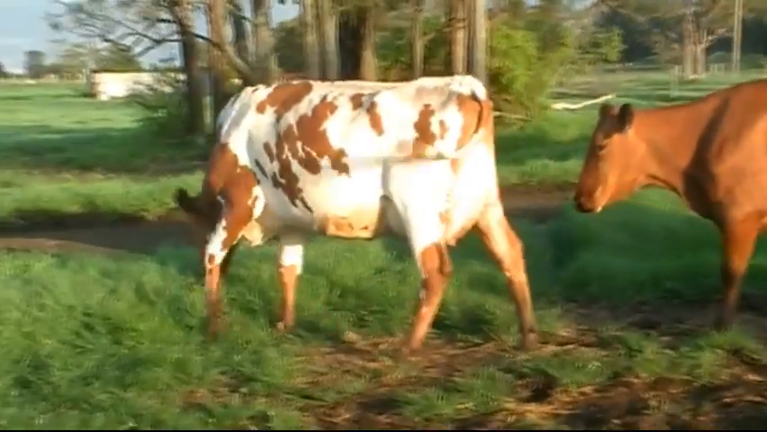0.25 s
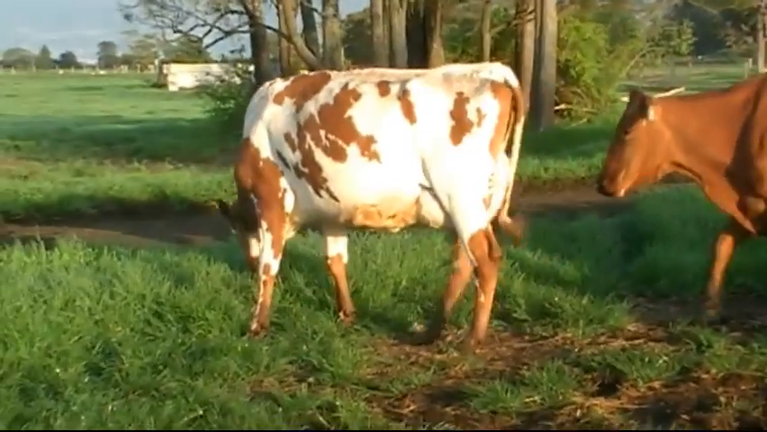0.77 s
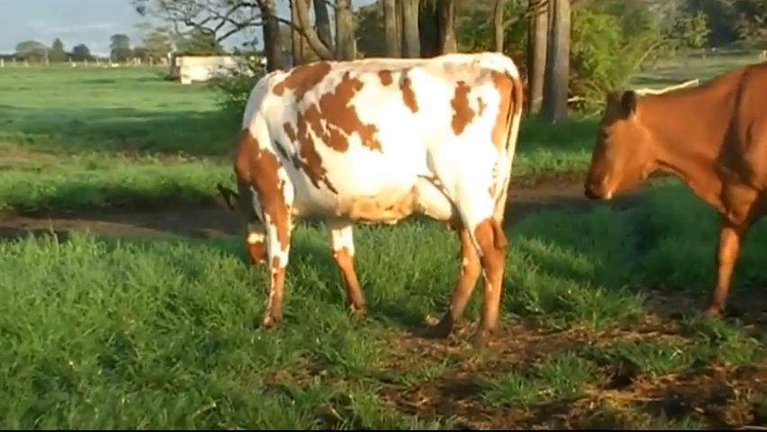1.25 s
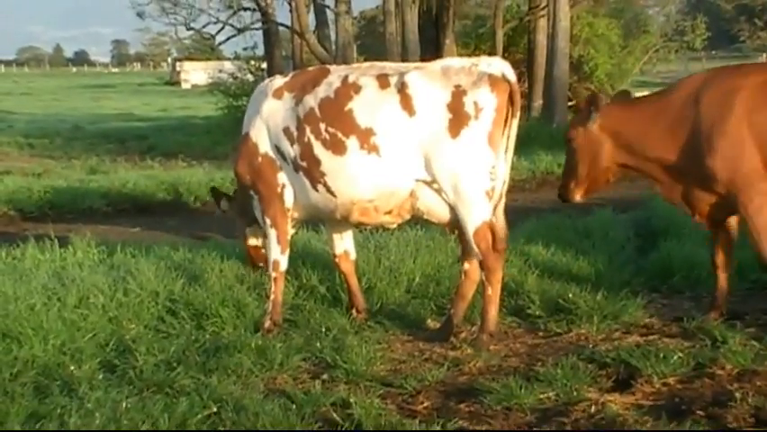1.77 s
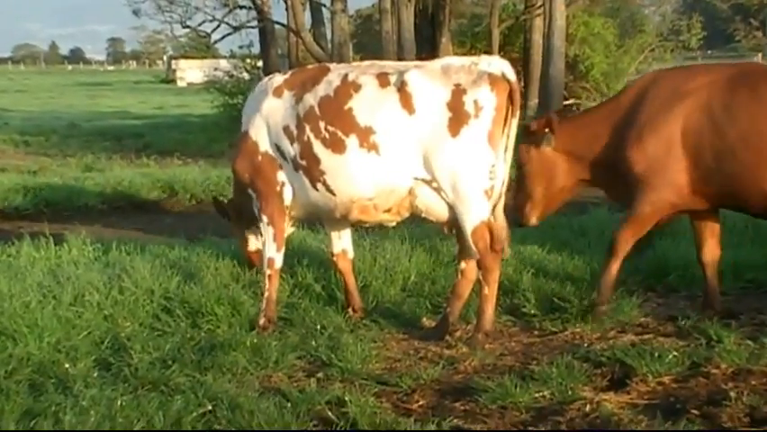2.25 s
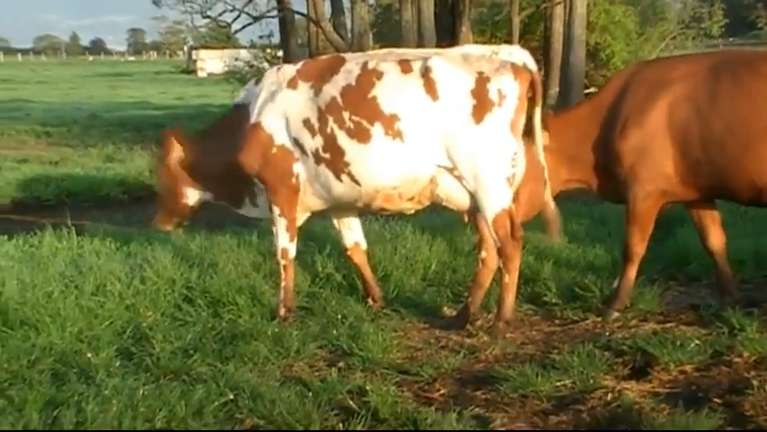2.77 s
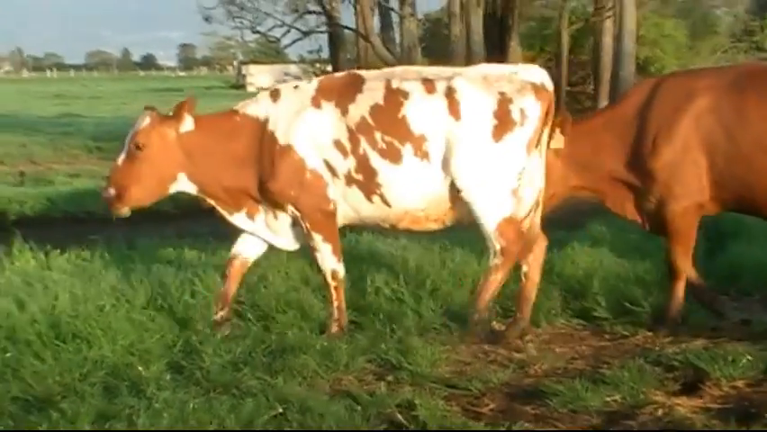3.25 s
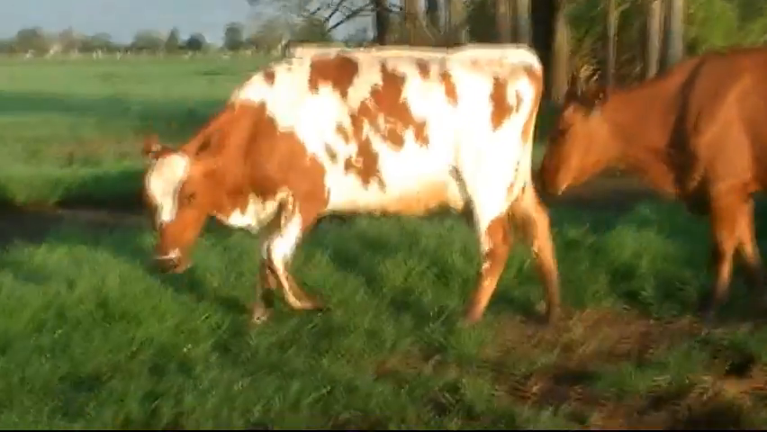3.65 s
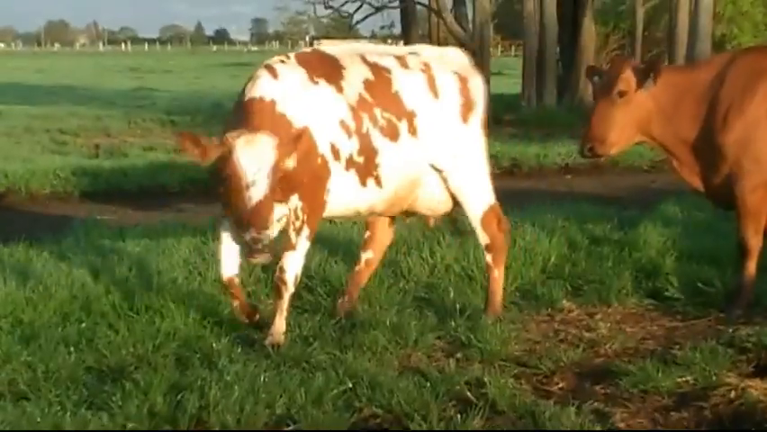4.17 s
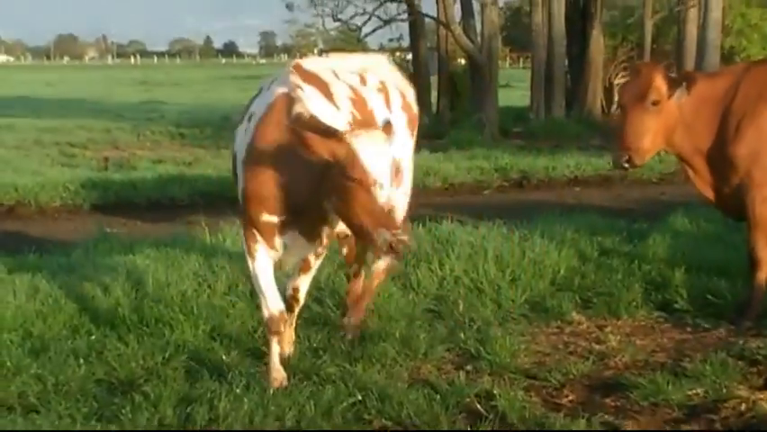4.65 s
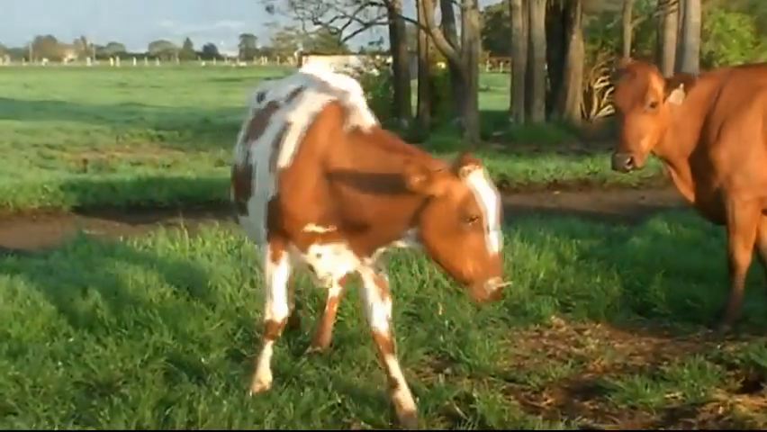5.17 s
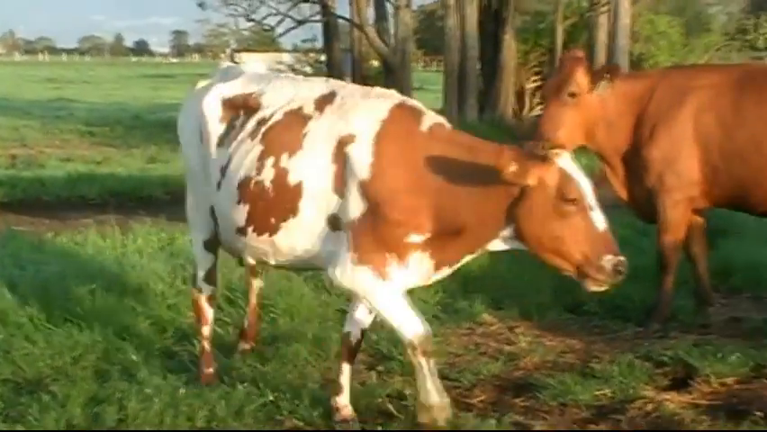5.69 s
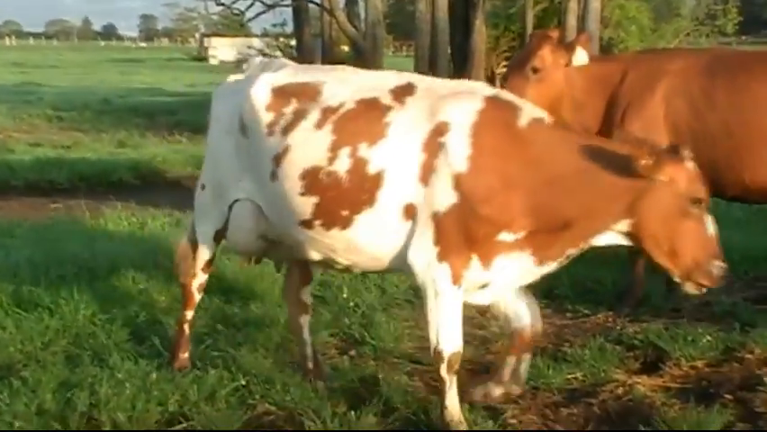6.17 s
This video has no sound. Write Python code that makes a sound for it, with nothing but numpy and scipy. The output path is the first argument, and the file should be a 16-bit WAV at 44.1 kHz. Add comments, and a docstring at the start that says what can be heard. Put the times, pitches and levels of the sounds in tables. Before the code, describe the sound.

Outdoors in a quiet pasture, the tails of two cow moos sink away at once. Grass swishes and a stalk snaps, a distant moo rises, then a growl climbs into a soft held note and drops to a hum. A loud, cracking bellow follows, overlapped by a hoarse second cow. Afterwards only faint birds, rustling grass and far moos remain. Stereo microphones, with the herd off to one side.

```python
"""Cows moo over one another in an open paddock: low growls climb, break hoarsely into held notes, and
some notes sink as the air runs out. Distant moos, grass swishes, snapping stalks, bird trills and whistles.
Moos are vocal-fold pulses and air puffs through throat resonances; grass and field are shaped noise;
birds are gliding sines; trees add a faint echo of the herd."""
import sys
import numpy as np
from scipy import signal
from scipy.fft import rfft, irfft, next_fast_len
from scipy.io import wavfile
from scipy.ndimage import uniform_filter1d

SR = 44100
rng = np.random.default_rng(int(sys.argv[2]) if len(sys.argv) > 2 else 0)


def materialize(psi):
    """Save the field psi as 16-bit PCM at rate SR to the path in sys.argv[1].

    A 1-D psi becomes a single channel; in a 2-D psi each row is a channel.
    """
    bounded = np.clip(np.atleast_2d(psi).T, -1, 1)
    quanta = np.round(bounded * 32767).astype(np.int16)
    wavfile.write(sys.argv[1], SR, quanta)


N = 283122
TIME = np.arange(N) / SR
CUTOFF_HZ = 15800


def from_db(db):
    """Decibels to amplitude gain."""
    return 10 ** (np.asarray(db) / 20)


def rms_one(x):
    """Scale to rms 1."""
    return x / np.sqrt(np.mean(x ** 2) + 1e-20)


def band(x, edges_hz, kind, order=4):
    """Butterworth filter."""
    return signal.sosfilt(signal.butter(order, edges_hz, kind, fs=SR, output="sos"), x)


def colour(x, points):
    """Apply a (f/Hz, gain/dB) spectrum, interpolated over log frequency."""
    size = next_fast_len(N + 4096)
    hz, db = np.transpose(points)
    bin_hz = np.arange(size // 2 + 1) * SR / size
    gain = from_db(np.interp(np.log(bin_hz + 1), np.log(hz), db))
    return irfft(rfft(x, size) * gain, size)[..., :N]


def drift(knots_per_s, size):
    """Random curve of straight segments, rms 1."""
    knots = np.arange(size) * knots_per_s / SR
    return rms_one(np.interp(knots, np.arange(8192), rng.standard_normal(8192)))


def even(x, size=1500):
    """Flatten slow level changes; size in samples."""
    return x / np.sqrt(np.abs(uniform_filter1d(x * x, size)) + 1e-12)


def fade(start, end, fade_s=.02):
    """1 from start to end, ramping to 0 just outside."""
    return np.clip(1 + np.minimum(TIME - start, end - TIME) / fade_s, 0, 1)


def progress(start, end):
    """Runs from 0 at start to 1 at end."""
    return np.clip((TIME - start) / (end - start), 0, 1)


def from_right(x):
    """Sound from the right: the left channel lags by a phase that depends on frequency."""
    # f/Hz, phase lag/rad
    lag = [(0, 1.6), (260, 1), (1000, 1.62), (2100, 1.6), (4300, 2.65), (7200, 3.9), (12500, 6.4)]
    size = next_fast_len(N + 4096)
    bin_hz = np.arange(size // 2 + 1) * SR / size
    phase = np.interp(bin_hz, *np.transpose(lag))
    left = irfft(rfft(x, size) * np.exp(-1j * phase), size)[:N]
    return np.array([left, x])


def field(level_db=-48.5, side_db=-7, left_db=2.5):
    """A soft wash of distant country noise: common and opposed noise make the two sides partly differ."""
    # open-air spectrum: f/Hz, level/dB
    spectrum = [(15, -47), (25, -13), (97, 0), (126, -5), (366, -16.5), (488, -11.5), (533, -9),
                (1130, -15), (1610, -19), (2900, -31), (3650, -22.5), (5000, -30.5), (6500, -20.5),
                (11000, -120)]
    mid, side = band(colour(rng.standard_normal((2, N)), spectrum), 4530, "low")
    left_right = np.array([[1], [-1]])
    wash = rms_one(mid) + from_db(side_db) * rms_one(side) * left_right
    return from_db(level_db + left_db * left_right) * wash


def resonate(x, modes, wander=0):
    """Parallel resonances of alternating sign, each wandering around its own frequency."""
    wander_knots_per_s = 14
    out = 0
    for k, (hz, width_hz, db) in enumerate(modes):
        r = np.exp(-np.pi * width_hz / SR)
        path = np.cumsum(1 + wander * drift(wander_knots_per_s, x.shape[-1]))
        turn = np.exp(2j * np.pi * hz / SR * path)
        # shift the resonance to 0 Hz, smooth, shift back
        ringing = turn * signal.lfilter([1, 1], [1, -r], x * turn.conj())
        out = out + (-1) ** k * from_db(db) * (1 - r) * ringing.real
    return out


def moo(gesture, throat, jitter=0.038, chest_air=0.34, mouth_air=6.8, rasp_air=4, top_hz=3800,
        hiss_db=-35, doubling=0.61):
    """Vocal-fold pulses and puffs of turbulence ring the throat; roughness unsettles both."""
    # muzzle air spectrum: f/Hz, level/dB
    breath = [(2800, -12), (4100, 1.5), (4650, 12.5), (5300, 11), (6000, 1), (11000, -2.5), (13000, -4),
              (15500, -36.5)]
    throat_wander = .014  # tongue and jaw shift each resonance by this share of its frequency
    flutter_db, flutter_knots_per_s = 1.5, 28
    gate, *controls = gesture
    on = gate > 0
    t, out = TIME[on], np.zeros(N)
    pitch, chest_db, mouth_db, rasp_db, rough = [np.broadcast_to(c, N)[on] for c in controls]
    # slight waver, plus fast irregularity in strained folds
    pitch = pitch * (1 + .003 * drift(25, len(t)) + jitter * rough * drift(260, len(t)))
    cycles = np.cumsum(pitch) / SR
    flow = .5 - cycles % 1
    pulses = rms_one(band(np.diff(flow, prepend=.5), CUTOFF_HZ, "low", order=2))
    # strained folds close strongly and weakly in turn: lines between the overtones
    pulses = pulses * (1 + doubling * rough * np.cos(np.pi * cycles))
    # one air puff per fold opening
    puffs = rms_one(rng.standard_normal(len(t)) * (.5 + 2 * np.exp(-4 * (cycles % 1))))
    tone, air = resonate(np.array([pulses, puffs * rough]), throat, throat_wander)
    # chest: the air flow itself; mouth and rasp: the throat's overtones
    rumble = chest_air * rough * rms_one(band(puffs, [190, 330], "band"))
    chest = band(rms_one(flow) + rumble, 336, "low", order=6)
    chest = even(band(chest, 140, "high", order=2))
    mouth = even(band(tone + mouth_air * air, [470, 1050], "band"))
    rasp = band(tone + rasp_air * air, 1195, "high", order=6)
    rasp = even(band(rasp, top_hz, "low"))
    rasp_db = rasp_db + flutter_db * drift(flutter_knots_per_s, len(t))
    shimmer = from_db(2 * rough * drift(90.04, len(t)))
    voice = from_db(chest_db) * chest + from_db(mouth_db) * mouth + from_db(rasp_db) * rasp
    out[on] = shimmer * voice
    # the harder the rasp, the more air hisses through the muzzle
    hiss = np.zeros(N)
    hiss[on] = puffs * from_db(rasp_db + hiss_db)
    return (out + colour(hiss, breath)) * gate


def held(note, ending=None):
    """Pitch, levels and roughness follow the note's points; an ending adds a last push and a sinking pitch."""
    s, *columns = np.transpose(note)
    pitch, chest_db, mouth_db, rasp_db, rough = [np.interp(TIME, s, c) for c in columns]
    if ending is None:
        return fade(s[0], s[-1]), pitch, chest_db, mouth_db, rasp_db, rough
    sink, silent, octaves_per_s, push_db, loss_db_per_octave = ending
    knee_s = .021  # rounds the bend
    push_octaves, rasp_push = 0.24, 0.37  # push peaks this far down; share of it in the rasp
    sunk = octaves_per_s * knee_s * np.logaddexp(0, (TIME - sink) / knee_s)
    push = push_db * sunk / push_octaves * np.exp(1 - sunk / push_octaves)
    loss = loss_db_per_octave * sunk
    steadied = rough * from_db(-push / 2)  # the push steadies the folds
    return (fade(s[0], silent, fade_s=.022), pitch / 2 ** sunk, chest_db + push - loss,
            mouth_db + push - loss, rasp_db + rasp_push * push - loss, steadied)


def growl(start, end, start_hz, end_hz, chest_db, mouth_db, rasp_db, swell_db):
    """The folds tighten: the gap between pulses shrinks steadily as the sound swells."""
    roughness, overtone_swell = 0.16, 0.19  # share of the swell in mouth and rasp
    attack_s, onset_db = 0.096, 12  # overtones start this much weaker
    done = progress(start, end)
    pitch = 1 / ((1 - done) / start_hz + done / end_hz)
    effort_db = swell_db * (done - 1)
    late_db = onset_db * (1 - progress(start, start + attack_s))
    overtone_db = overtone_swell * effort_db - late_db
    return (fade(start, end), pitch, chest_db + effort_db, mouth_db + overtone_db,
            rasp_db + overtone_db, roughness)


def nose_buzz(gate, pitch, start, end, lower_hz, upper_hz, db, sag=.06, width_hz=190, jitter=.003):
    """Slow pulses ring two nasal resonances, which sag and fade as the mouth takes over."""
    on, out = (TIME > start) & (TIME < end), np.zeros(N)
    done = progress(start, end)[on]
    harmonics = np.arange(16, 70)[:, None]
    hz = harmonics * pitch[on]
    cycles = np.cumsum(pitch * (gate > 0))[on] / SR + jitter * drift(260, len(done))
    centres = [centre * (1 - sag * done) for centre in (lower_hz, upper_hz)]
    nose = sum((1 + 1j * (hz - centre) / width_hz) ** -2 for centre in centres)
    buzz = np.real(nose * np.exp(2j * np.pi * harmonics * cycles)).sum(axis=0)
    out[on] = from_db(db) * rms_one(buzz) * np.sin(np.pi * np.sqrt(done)) ** 2
    return out


def voice_break(start, end, start_hz, end_hz, chest_db, mouth_db, rasp_db, rough):
    """Between registers the folds flap irregularly in one arch of effort."""
    arch_db = 1.5  # weaker by this at the edges
    done = progress(start, end)
    effort_db = -arch_db * (2 * done - 1) ** 2
    pitch = start_hz + (end_hz - start_hz) * done
    return (fade(start, end, fade_s=0.027), pitch, chest_db + effort_db, mouth_db + effort_db,
            rasp_db + effort_db, rough)


def cracks(throat):
    """Single hard closures of the folds ring the throat."""
    # folds slapping shut as the bellow cracks: t/s, level/dB
    closures = [(3.202, -8), (3.208, -8), (3.33, -11), (3.37, -9)]
    slaps = np.zeros(N)
    for s, db in closures:
        slaps[int(s * SR)] = from_db(db)
    click = band(resonate(signal.unit_impulse(2048), throat), 3000, "low", order=2)
    return signal.fftconvolve(slaps, click / np.abs(click).max())[:N]


def near_cows():
    """The cows close by, overlapping, built from growls, breaks, held notes and endings."""
    # throat and muzzle resonances: f/Hz, width/Hz, level/dB
    open_throat = [(272, 91, 6), (624, 60, 7), (937, 73, -5), (1186, 135, -8.5), (1505, 69, -19.5),
                   (2030, 170, -39)]
    thin_throat = [(520, 49, 5), (643, 64, -10), (1150, 380, -10), (1510, 270, -1.5), (1920, 89, -12),
                   (2110, 80, -10)]
    round_throat = [(149, 340, -4), (511, 160, -0.5), (608, 87, 2), (840, 96, 1), (1177, 32, -4.5),
                    (1512, 170, -15.5), (1580, 125, -16.5), (2650, 340, -48)]
    nasal_throat = [(114.3, 480, 4.5), (746, 95, 16.5), (1507, 110, 0.5), (1967, 75, -6), (2410, 99, -6),
                    (3050, 76, -8.5), (3530, 220, -12)]
    wide_throat = [(298, 111, 2), (540, 273, 0), (722, 147, 4), (862.4, 63.8, 4.5), (1078, 112, -8.5),
                   (1500, 200, -17.5), (1829, 155, -17.5), (2397, 190, -21.5), (3030, 1400, -32)]
    hoarse_throat = [(294, 128, -1.5), (470, 83, 1.5), (624, 33, 0.5), (935, 73, 2), (1243, 117, -3.5),
                     (1415, 175, -8.5), (1944, 174, -17), (2333, 130, -18.5), (3155, 220, -30.5)]
    # mouth nearly shut: f/Hz, width/Hz, level/dB
    hum_throat = [(169, 163, 5.5), (525, 220, -1.5), (650, 27, -19), (1150, 220, -41)]
    # held notes: t/s, pitch/Hz, chest level/dB, mouth level/dB, rasp level/dB, roughness
    sinking_note = [(0, 335.6, -27.5, -28.5, -28, 0.11), (.11, 318.2, -26, -35, -28, 0.16),
                    (.15, 278.8, -18, -35, -41, .45), (.25, 238.7, -25.5, -36, -41, 0.19)]
    fading_note = [(0, 271.1, -25.5, -30, -29, 0.23), (.11, 253.6, -17, -30, -32, 0.24),
                   (.2, 247.2, -16, -35, -37, 0.83), (.24, 239.5, -16, -38, -56, .3),
                   (.37, 235.3, -40.5, -59, -56, 0.26)]
    rising_note = [(2.45, 255.8, -27, -30.5, -44, 0.25), (2.51, 262.7, -24.5, -26, -50, 0.027),
                   (2.65, 270.1, -23.5, -36, -50, 0.11), (2.76, 278.6, -20.5, -31.5, -47.5, 0.61),
                   (2.825, 271.3, -20, -32.5, -48, 0.29)]
    low_note = [(2.852, 168.3, -27.5, -33.5, -57, 0.068), (3.11, 167, -26, -28.5, -59, 0.13),
                (3.21, 168.1, -20.5, -31, -25, 0.23), (3.35, 193.6, -26, -23, -60, 0.27)]
    bellow_note = [(3.385, 283, -15, -12, -24, 0.16), (3.553, 297.5, -19.5, -16, -26, 0.17),
                   (3.759, 309.6, -14, -19.5, -24.5, 0.17), (3.869, 302.5, -13, -22, -29, 0.21),
                   (4.111, 311.5, -15, -20.5, -27.5, .15), (4.215, 297.2, -17, -26, -29.5, 0.31),
                   (4.36, 305.5, -17.5, -25.5, -32, 0.24)]
    hoarse_note = [(4.24, 263, -23.5, -41.5, -45, 0.32), (4.57, 298.9, -25.5, -27.5, -36, .45),
                   (4.72, 274.3, -21.5, -22, -29.5, .58), (4.89, 264.3, -22, -25, -27.5, 0.53),
                   (4.96, 250.4, -19, -23, -25, .38), (5.03, 238.9, -22.5, -26.5, -21.5, 0.27)]
    # air runs out: sink t/s, silent t/s, sink rate/(octave/s), push/dB, loss/(dB/octave)
    endings = [(.245, .33, 13, 1.5, 3.5), (4.422, 4.47, 13.8, 10, 12), (5.008, 5.068, 9.5, 1, 2.5)]
    # start t/s, end t/s, start f/Hz, end f/Hz, final chest, mouth and rasp levels/dB, swell/dB
    growl_rows = [(1.52, 2.265, 69.1, 145.8, -36, -49.5, -51.5, 12.5),
                  (2.845, 3.138, 82.3, 124.2, -32.5, -32, -32.5, 8),
                  (3.944, 4.227, 76.9, 186.6, -32.5, -55, -42.5, 11.5),
                  (6.252, 6.42, 64.7, 69.9, -41.5, -80, -52.5, 16.5)]
    # start t/s, end t/s, start f/Hz, end f/Hz, chest, mouth and rasp levels/dB, roughness
    break_rows = [(2.28, 2.437, 176.6, 230.6, -28, -32, -36, 0.92),
                  (3.136, 3.21, 245.7, 229.4, -19.5, -33.5, -28.5, 1.23),
                  (3.203, 3.366, 222, 264.2, -26.5, -28.5, -26, 1)]
    # growl buzzing through the nose: start t/s, end t/s, lower f/Hz, upper f/Hz, level/dB
    buzz_rows = [(1.532, 1.924, 3040, 3800, -51), (2.841, 3.161, 3400, 3570, -40.5)]
    growls = [growl(*row) for row in growl_rows]
    breaks = [voice_break(*row) for row in break_rows]

    # two cows are finishing their moos
    out = moo(held(sinking_note, ending=endings[0]), open_throat, top_hz=2400, hiss_db=-23.0)
    out += moo(held(fading_note), thin_throat, top_hz=2500)
    # the next climbs to a clear note, then flips down to a hum
    out += moo(growls[0], round_throat, jitter=.015, mouth_air=1.2, rasp_air=3, top_hz=2000)
    out += moo(breaks[0], round_throat, jitter=0.047, mouth_air=2.3, rasp_air=3.3, top_hz=2120)
    out += moo(held(rising_note), round_throat, chest_air=0.2, mouth_air=5.3, rasp_air=9.5, top_hz=2900)
    out += moo(held(low_note), hum_throat, jitter=0.024, mouth_air=2.6, rasp_air=2.3, top_hz=1810)
    # the bellow starts as a nasal buzz before the mouth opens
    out += moo(growls[1], nasal_throat, jitter=.06, rasp_air=4.5, hiss_db=-14)
    for part in breaks[1:]:
        out += moo(part, wide_throat, jitter=0.03, mouth_air=1.4, rasp_air=3.1, hiss_db=-14.0)
    out += moo(held(bellow_note, ending=endings[1]), wide_throat, jitter=0.039, mouth_air=1.65,
               rasp_air=7.5, hiss_db=-14.5)
    out += cracks(wide_throat)
    # the first two growls buzz through the nose
    for (gate, pitch, *_), row in zip(growls, buzz_rows):
        out += nose_buzz(gate, pitch, *row)
    # a hoarse cow takes over from the bellow
    out += moo(growls[2], hoarse_throat)
    out += moo(held(hoarse_note, ending=endings[2]), hoarse_throat, jitter=.055, chest_air=.7,
               mouth_air=1.8, rasp_air=2.2, hiss_db=-18.5, doubling=1.1)
    # a last growl
    return out + moo(growls[3], round_throat)


def tree_echo(x, t60_s=.33, dull_hz=3000, thin_hz=350):
    """Trunks scatter a faint, dull tail: decaying filtered noise, different on each side."""
    t = TIME[:SR]
    tail = band(rng.standard_normal((2, SR)), dull_hz, "low", order=1)
    tail = tail * from_db(-60 * t / t60_s) * (t > .02)
    tail = band(tail, thin_hz, "high", order=1)
    return signal.fftconvolve(x[None], tail / np.sqrt(np.sum(tail ** 2) / 2), axes=1)[:, :N]


def grass(grain_db=3.2, clump_db=2, rustle_db=-61, snap_db=-8, snap_s=0.0087, tick_db=1, tick_s=.0015):
    """Blades brush past the legs in clumps of noise grains; stalks snap as decaying noise bursts."""
    # legs through grass: centre t/s, level/dB, Gaussian sigma/s
    swishes = [(.38, -57, .14), (.8, -49, .07), (1.62, -44.5, .045), (2.41, -44.5, .03), (5.23, -56, .04),
               (5.39, -55, .05), (5.98, -49.5, .055)]
    # stalks snapping: t/s, relative level/dB
    stalks = [(0.6428, -41), (0.792, -36.5), (1.6647, -46), (5.348, -44), (5.5947, -46), (5.843, -41.5)]
    # f/Hz, relative level/dB
    spectrum = [(1200, -41.5), (2500, -12), (6000, -17), (8500, -11), (11000, -11.5), (13000, -20),
                (15500, -32)]
    swish = from_db(rustle_db)
    for s, db, sigma_s in swishes:
        swish = swish + from_db(db) * np.exp(-((TIME - s) / sigma_s) ** 2 / 2)
    grains = from_db(grain_db * drift(1000, N) + clump_db * drift(49, N))
    snaps = 0
    for s, db in stalks:
        for gain_db, decay_s in ((snap_db, snap_s), (tick_db, tick_s)):
            snaps = snaps + from_db(db + gain_db) * (TIME >= s) * np.exp(-np.abs(TIME - s) / decay_s)
    # stalks are spread over the ground: the sides are only partly alike
    noise = from_right(rng.standard_normal(N)) + 2.5 * rng.standard_normal((2, N))
    blades = rms_one(band(colour(noise, spectrum), 900, "high", order=2))
    return (swish * rms_one(grains) + snaps) * blades


def far_arch(start, end, crest, crest_hz, bend, mouth_db, rasp_db):
    """A distant moo rises to a crest of pitch and level and falls away."""
    chest_db, roughness, fade_db_per_s = -63.5, 0.04, 5
    away_s = np.abs(TIME - crest)
    loss_db = fade_db_per_s * away_s
    pitch = crest_hz * (1 - bend * away_s ** 2)
    return fade(start, end), pitch, chest_db - loss_db, mouth_db - loss_db, rasp_db - loss_db, roughness


def far_cows():
    """Distance leaves mainly thin, clean overtones."""
    # f/Hz, width/Hz, level/dB
    far_throat = [(445, 52, 26), (1260, 133, 8), (1630, 110, -2.5), (2350, 75, -8)]
    # start t/s, end t/s, crest t/s, crest f/Hz, relative pitch bend/(1/s^2), mouth and rasp levels/dB
    far_moos = [(1.054, 2.242, 1.85, 156.4, 0.16, -55.5, -51.5),
                (5.303, 5.98, 5.6, 164, 1.15, -61.5, -58.5), (6.147, 6.406, 6.3, 152.8, 0.55, -63, -58)]
    return sum(moo(far_arch(*row), far_throat) for row in far_moos)


def whistles(waver_hz=70):
    """A second bird's thin notes: falling sines with a quick random waver."""
    # start t/s, end t/s, start f/Hz, end f/Hz, level/dB
    calls = [(1.788, 1.892, 4900, 4740, -48), (2.11, 2.237, 4800, 4640, -47)]
    out = 0
    for start, end, start_hz, end_hz, db in calls:
        hz = start_hz + (end_hz - start_hz) * progress(start, end) + waver_hz * drift(150, N)
        tone = np.sin(2 * np.pi * np.cumsum(hz) / SR)
        out = out + from_db(db) * fade(start, end, fade_s=0.011) * tone
    return out


def bird_trills(note_share=.65):
    """Runs of short falling sine notes, each filling note_share of the spacing."""
    # start t/s, end t/s, note spacing/s, top f/Hz, bottom f/Hz, level/dB
    trills = [(2.43, 2.8, .063, 3950, 3400, -58), (5.32, 5.45, .2, 1900, 1700, -52),
              (5.578, 5.85, .06, 3950, 3400, -56), (5.865, 6.12, .037, 3800, 3450, -55.5),
              (6.215, 6.42, .039, 3800, 3450, -59)]
    out = 0
    for start, end, spacing_s, top_hz, bottom_hz, db in trills:
        done = np.minimum((TIME - start) / spacing_s % 1 / note_share, 1)
        hz = top_hz + (bottom_hz - top_hz) * done + 50 * drift(28, N)
        level = from_db(db + drift(15, N)) * fade(start, end)
        out = out + level * np.sin(np.pi * done) * np.sin(2 * np.pi * np.cumsum(hz) / SR)
    return out


def scene():
    """The herd stands off to the right; grass underfoot, trees echo, birds call."""
    near, far = near_cows(), far_cows()
    echoes = tree_echo(from_db(-18) * near + from_db(-6.5) * far)
    herd = from_db(1.0) * from_right(near + far)
    return field() + herd + echoes + grass() + from_right(whistles()) + bird_trills()


def record(dry):
    """The two microphones differ in colour; the top is cut."""
    # f/Hz, left minus right/dB
    balance = [(60, 2.5), (330, 4), (560, -2), (850, -1.5), (1150, -6), (1450, -4), (2000, -4.5), (7000, 0)]
    left = colour(dry[0], [(hz, db / 2) for hz, db in balance])
    right = colour(dry[1], [(hz, -db / 2) for hz, db in balance])
    top_cut = signal.cheby2(12, 70, CUTOFF_HZ + 700, fs=SR, output="sos")
    return signal.sosfilt(top_cut, [left, right])


dry = scene()
out = record(dry)
materialize(out)
```